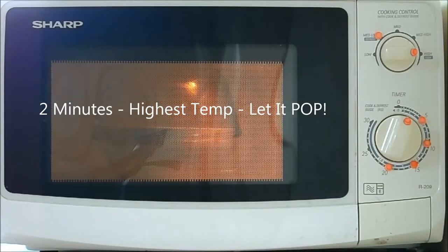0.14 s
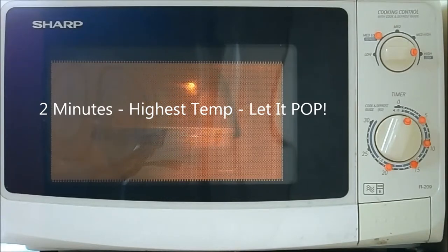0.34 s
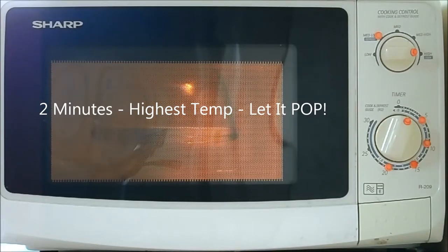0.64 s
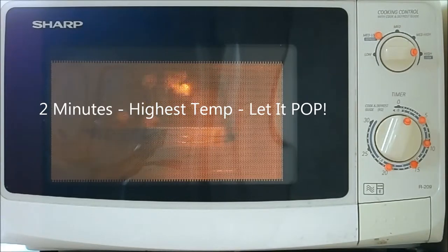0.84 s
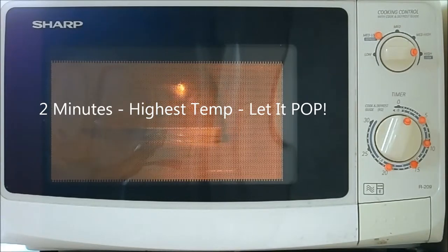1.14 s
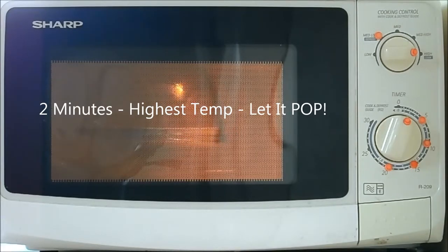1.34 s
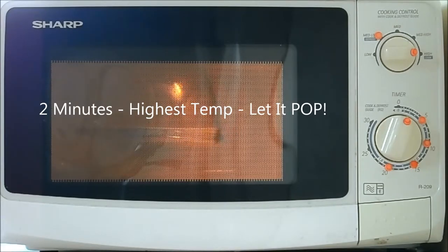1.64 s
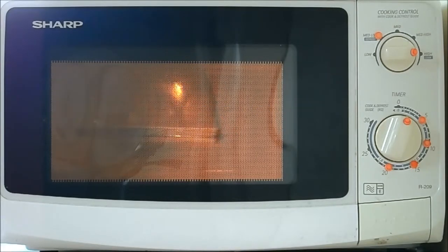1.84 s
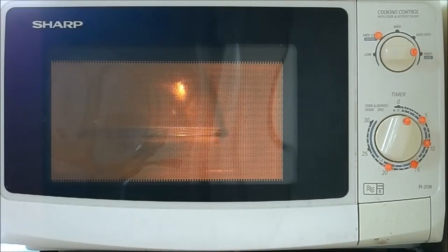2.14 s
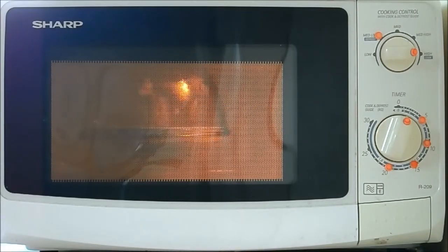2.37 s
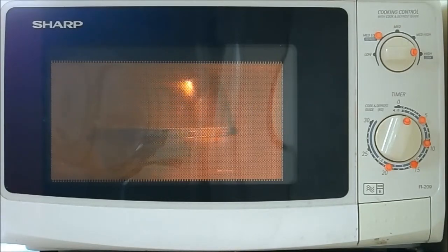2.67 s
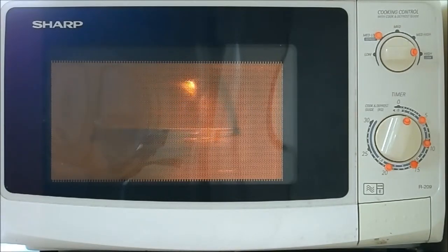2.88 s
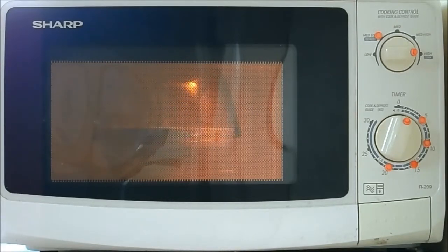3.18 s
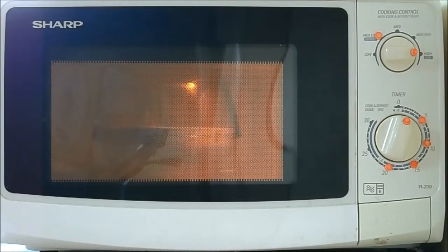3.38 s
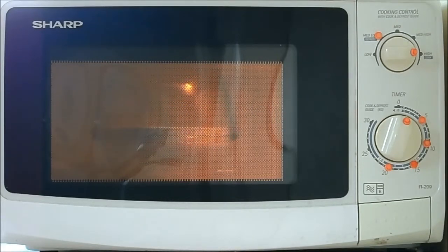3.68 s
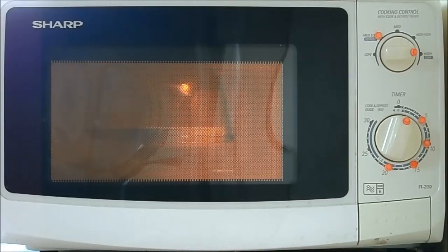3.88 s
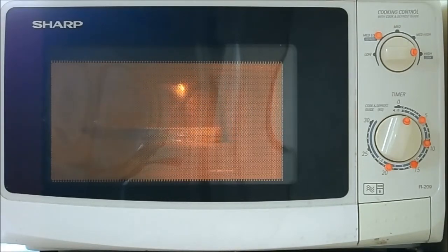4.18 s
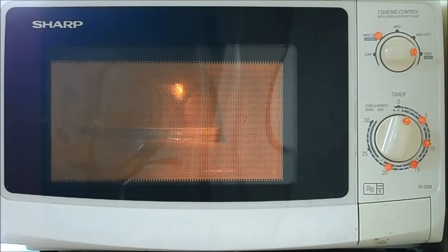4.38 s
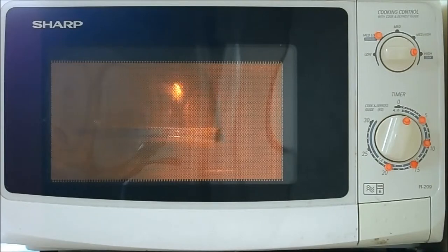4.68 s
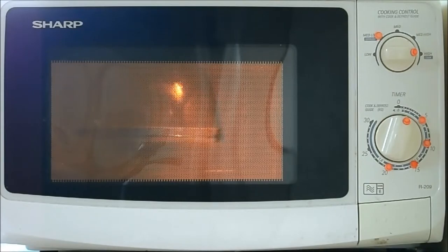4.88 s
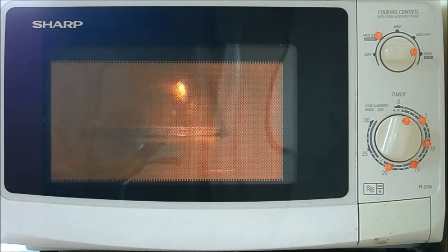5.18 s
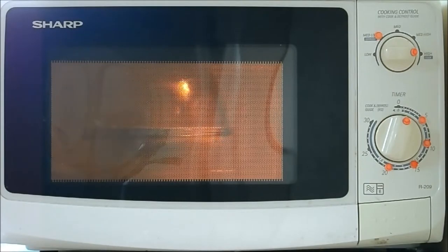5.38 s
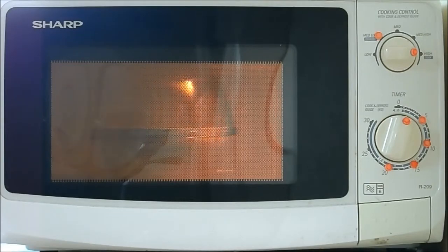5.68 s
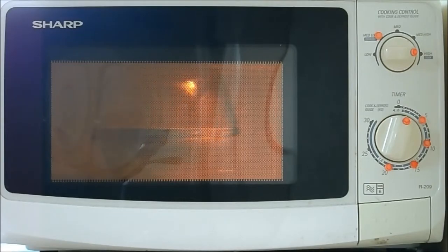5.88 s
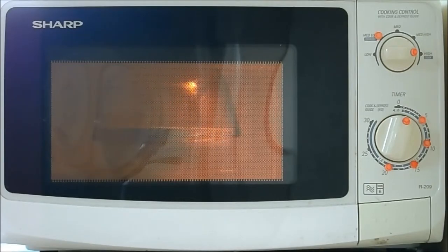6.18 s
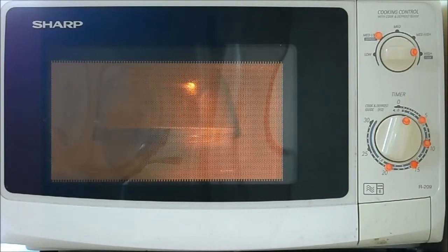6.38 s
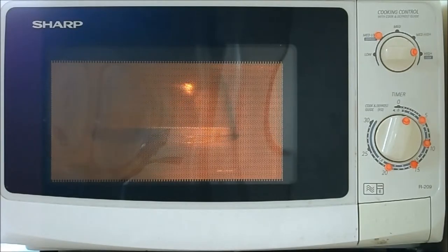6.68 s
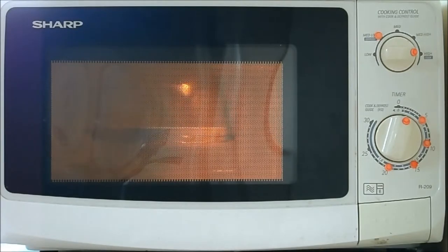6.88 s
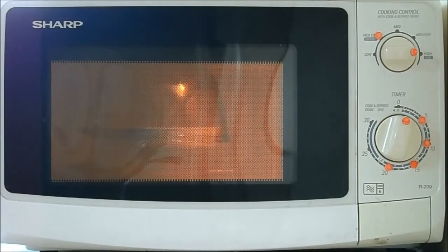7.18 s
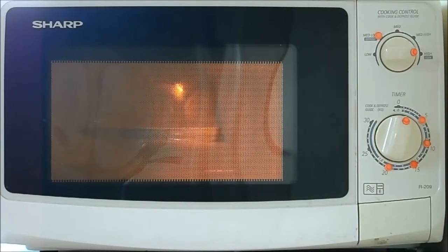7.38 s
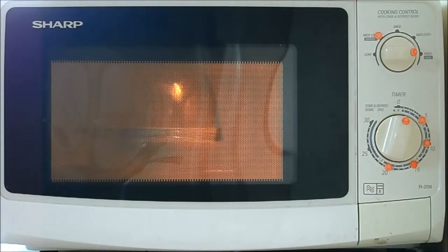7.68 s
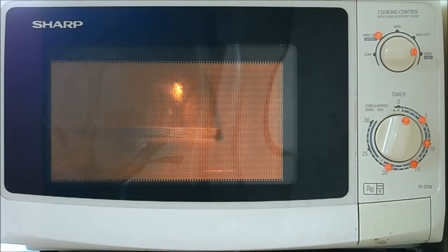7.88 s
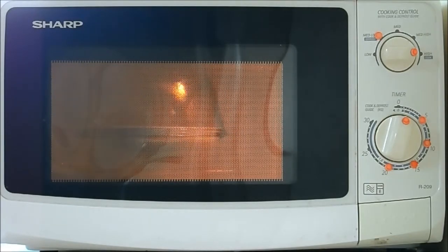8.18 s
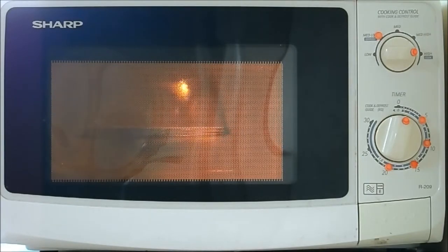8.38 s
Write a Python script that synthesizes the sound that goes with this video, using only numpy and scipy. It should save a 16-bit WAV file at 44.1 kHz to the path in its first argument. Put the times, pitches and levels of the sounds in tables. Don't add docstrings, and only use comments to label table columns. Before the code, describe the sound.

Close, mono pickup of a running microwave oven in a kitchen. A steady fan hum with faint electrical buzz and soft rushing vent air continues throughout. Inside, popcorn bursts singly or in quick pairs at irregular gaps: short, boxy metallic thuds, each with a quick high rattle and brief ring of corn hitting a glass bowl. A few soft low bumps come through the counter near the middle.

```python
import sys
import numpy as np
from scipy import signal
from scipy.fft import rfft, irfft
from scipy.io import wavfile
from scipy.ndimage import uniform_filter1d

SR = 44100
rng = np.random.default_rng(int(sys.argv[2]) if len(sys.argv) > 2 else 0)


def field_ratio(decibels):
    return 10 ** (np.asarray(decibels, dtype=float) / 20)


def put_to_file(sound):
    columns = np.atleast_2d(sound).T
    safe = np.clip(columns, -1, 1)
    whole_steps = np.round(safe * 32767)
    wavfile.write(sys.argv[1], SR, whole_steps.astype(np.int16))


N = 376173

# t/s, peak level/dB, treble level/dB against the usual burst, low bowl ring f/Hz
BURSTS = [(.0063, -32.5, 12, 6320), (.2394, -31, 0, 6390), (.3352, -30.5, -6, 7440),
          (.9035, -32.5, -3, 6630), (1.0628, -30, -4, 7390), (1.1279, -33.5, -2, 6700),
          (1.3128, -31.5, -4, 6420), (1.5332, -32, -3, 6880), (1.5718, -28.5, -8, 6880),
          (1.8315, -27.5, -5, 6630), (1.9204, -30.5, 0, 6510), (2.4484, -38, 0, 6710),
          (2.8359, -33, 4, 6850), (3.2009, -26, -11, 6360), (3.4008, -30.5, 2, 6790),
          (3.8093, -26, 1, 6430), (4.1547, -28, 2, 6670), (4.3586, -35, -2, 6700),
          (4.5175, -32.5, -2, 6570), (4.6794, -29, -2, 6800), (5.3646, -30, 0, 6760),
          (5.8855, -29, -4, 7000), (6.326, -28.5, -4, 7030), (6.5128, -28.5, 7, 7020),
          (6.5543, -24, -1, 6950), (6.6259, -33, -5, 6940), (7.3254, -25.5, -5, 7000),
          (7.3844, -26.5, 2, 6800), (7.5368, -29.5, -3, 7030), (8.3249, -34, -4, 7100)]
# t/s, peak level/dB, treble level/dB, low bowl ring f/Hz
TWINS = [
    (.2537, -32, 6, 7560),
    (1.8379, -39, 0, 6810),
    (3.2134, -24, 4, 6250),
    (4.5247, -30, -5, 6570),
]
# f/Hz, level/dB, t60/s, sign (+1 or -1 as the mode pushes or pulls the door)
CAVITY = [(125, -37, .25, -1), (242, -30, .103, -1), (295, -21, .059, -1), (367, -20, .033, -1),
          (462, -11, .012, 1), (583, -15, .058, -1), (613, -27, .25, 1), (647, -14, .046, 1),
          (738, -16, .049, -1), (858, -9, .054, -1), (874, 0, .017, 1), (931, -6, .026, -1),
          (989, -18, .074, -1), (1036, -17, .056, -1), (1105, -24, .13, 1), (1185, -32, .171, -1),
          (1227, -14, .023, -1), (1325, -32, .082, -1), (1430, -29, .076, -1), (1498, -26, .05, 1),
          (1811, -30, .084, -1), (2080, -27, .12, 1), (2170, -23, .16, -1), (2290, -28, .12, 1),
          (3450, -18, .08, 1)]
# t/s, low ring level/dB,
# middle ring level/dB, high ring level/dB
KNOCKS = [(.0044, -50, -57, -52.5), (.2409, -52, -57, -58), (.2525, -45, -50, -50), (.3371, -50, -55, -51),
          (.911, -47, -50, -59), (1.071, -48, -50, -56), (1.1313, -44, -47.5, -50),
          (1.3164, -50, -45.5, -57), (1.536, -44, -51, -59), (1.575, -49, -51, -60),
          (1.8365, -47, -44.5, -42), (1.922, -53, -48, -37.5), (2.4543, -53, -52, -58),
          (2.837, -46.5, -55, -46), (3.2056, -47, -49, -40), (3.216, -39, -41.5, -44),
          (3.4037, -53, -52, -55), (3.811, -52, -48, -39), (4.1565, -50, -53, -54), (4.524, -49, -47, -54),
          (4.683, -42, -53, -45), (5.3667, -49, -44.5, -45), (5.887, -46, -55, -49), (6.331, -47, -58, -48),
          (6.5153, -54, -55, -59), (6.5574, -39, -54, -48), (7.329, -48, -43, -50),
          (7.3891, -45.5, -51, -62), (7.54, -42, -46, -44), (8.3288, -54, -58, -63),
          (.9552, -54, -59, -58),
    (1.5994, -54, -63, -67),
    (6.3834, -51, -66, -65),
    (6.6268, -60, -63, -56),
]
# f/Hz, level/dB, t60/s
GLASS = [
    [(6250, 0, .07), (6370, 0, .08), (6520, -2, .07), (6750, -3, .06), (6900, 1, .08), (7060, 0, .08),
     (7430, -3, .09)],
    [(10300, -11, .05), (10680, 2, .1), (10850, -4, .07), (11000, -5, .07), (11200, -5, .06),
     (11430, -5, .06), (12100, -14, .04)],
    [(13100, -13, .04), (13700, -3, .07), (13900, 0, .09), (14020, 0, .08), (14200, -2, .07),
     (14400, -5, .06), (14600, -6, .06), (14900, -5, .06), (15300, -10, .05)],
]
# multiple of the shaft speed, rms level/dB
FAN = [(1, -63.5), (4, -44.5), (8, -62), (12, -63), (16, -65), (20, -69.5), (28, -68.5), (34, -75)]
# f/Hz, rms level/dB
BUZZ = [(120, -72), (400, -61.5), (800, -69.5), (1200, -61.5), (1800, -80)]
# f/Hz, level/dB per Hz
AIR = [(25, -20.1), (76, -16.5), (100, -18.5), (200, -10.7), (342, -10.4), (660, 0.0), (860, -8.2),
       (1250, -3.1), (1600, -3.6), (2100, -1.2), (3000, -10.4), (5000, -12.0), (7500, -15.1),
       (10500, -21.9), (15800, -24.4)]
# f/Hz, width/Hz, level/dB (below zero a dip)
VENTS = [(510, 100, -10.0), (770, 20, -10.0), (940, 20, -6.4), (1100, 50, 4.7), (1280, 70, 5.4),
         (1440, 20, 3.6), (1580, 200, -9.9), (1750, 30, -7.5), (1840, 30, -8.1), (1950, 60, -10.0),
         (2070, 40, 2.3), (2430, 160, 5.6), (2500, 40, -10.0), (2620, 60, 3.9), (2950, 40, -4.1),
         (3140, 180, 7.3), (3320, 30, -4.3), (3380, 20, 4.8), (3700, 20, 4.9), (3980, 60, 7.0),
         (4570, 130, 6.3), (4690, 40, -7.1), (5630, 120, 6.6), (5690, 80, -7.1), (6050, 120, 6.3),
         (6260, 620, -6.1), (6650, 200, 5.6), (8410, 190, 6.2), (10000, 60, 3.2), (12270, 170, 3.5)]
# t/s, peak level/dB, f/Hz, t60/s
THUMPS = [
    (4.325, -55, 60.7, 0.16),
    (4.409, -60, 70.0, 0.2),
    (4.459, -66, 88.8, 0.2),
    (4.573, -46, 78.1, 0.1),
    (4.599, -60, 75.4, 0.18),
    (4.585, -58, 280, 0.15),
    (4.618, -48, 84, 0.12),
    (4.719, -58, 94.2, 0.2),
]

BLAST_S = .00057
USUAL_DB, BASS_DB_PER_DB = -29.5, -0.4
REBOUND_S, REBOUND_DB = .012, -13
CONTACT_DB = -9
RING_SHARE, HIGH_PER_LOW = 0.75, 2.12
FAN_HZ, FAN_WOBBLE_HZ = 170.36, 0.235
UNBALANCE_HZ, UNBALANCE = 59.2, 0.086
AIR_DB = -48.5
COUNTER_HZ = 55
FLICKERS, FLICKER_S, FLICKER_DB = 38, .046, -68.5
TOP_HZ = 15730


def walk(rate):
    hold = int(SR / rate)
    steps = np.repeat(rng.standard_normal(N // hold + 1), hold)
    return 1.314 * uniform_filter1d(uniform_filter1d(steps, hold), hold)[:N]


def ring(push, hz, t60):
    pole = np.exp(2j * np.pi * hz / SR - np.log(1000) / (t60 * SR))
    return signal.lfilter([1], [1, -pole], push).imag


def add(out, s, sound):
    i = max(int(s * SR), 0)
    out[i:i + len(sound)] += sound[:N - i]


def rattle(size, count, spread_s, fade_db, first_db):
    push, chance = np.zeros(size), rng.random((count, 3))
    at = (chance[:, 0] * spread_s * SR).astype(int)
    level = field_ratio(-fade_db * (chance[:, 0] + chance[:, 2]))
    push[at] += np.sign(chance[:, 1] - .5) * level
    push[0] = field_ratio(first_db)
    return push


def bursts():
    out = np.zeros(N)
    for s, db, treble_db, _ in BURSTS + TWINS:
        bass_db = BASS_DB_PER_DB * (db - USUAL_DB)
        push = rattle(size=6500, count=7, spread_s=.028, fade_db=7, first_db=12)
        push = np.convolve(push, np.hanning(int(BLAST_S * SR)))[:6500]
        place = rng.standard_normal((len(CAVITY), 2))
        sound = 0
        for (hz, mode_db, t60, way), (shade, detune) in zip(CAVITY, place):
            level_db = mode_db + .7 * shade + bass_db * (hz < 420) + treble_db * (hz > 1700)
            sound = sound + way * field_ratio(level_db) * ring(push, hz * (1 + .002 * detune), t60)
        add(out, s, field_ratio(db) * sound / np.abs(sound).max())
    return signal.sosfilt(signal.butter(2, 170, "high", fs=SR, output="sos"), out)


def glass():
    out = np.zeros(N)
    for s, *family_db in KNOCKS:
        nearest = min(BURSTS + TWINS, key=lambda burst: abs(burst[0] - s))
        low_hz = nearest[3]
        push, back = (rattle(size=3600, count=36, spread_s=.017, fade_db=8, first_db=-8) for _ in range(2))
        add(push, REBOUND_S, field_ratio(REBOUND_DB) * back[:3600 - int(REBOUND_S * SR)])
        for family, level_db in zip(GLASS, family_db):
            hz, mode_db, t60 = np.transpose(family)
            shade, detune = rng.standard_normal((2, len(family)))
            mode_db = mode_db + 2 * shade - np.minimum(abs(hz - low_hz) / 70, 10) * (hz < 8000)
            mode_db -= np.minimum(abs(hz - HIGH_PER_LOW * low_hz) / 120, 7) * (hz > 13000)
            modes = zip(hz * (1 + .003 * detune), mode_db, t60)
            sound = sum(field_ratio(g) * ring(push, f, RING_SHARE * t) for f, g, t in modes)
            door = signal.butter(2, [hz[0] - 150, hz[-1] + 150], "band", fs=SR, output="sos")
            sound = signal.sosfilt(door, sound)
            add(out, s - .002, field_ratio(level_db + 2.5) * sound / np.abs(sound).max())
        contacts = np.diff(push, n=2)
        add(out, s - .002, field_ratio(max(family_db) + CONTACT_DB) * contacts)
    return out


def tone(hz, db, flutter_db):
    level = np.sqrt(2) * field_ratio(db + flutter_db * walk(9.8))
    return level * np.sin(2 * np.pi * (np.cumsum(hz) / SR + rng.random()))


def motor():
    shaft = FAN_HZ + FAN_WOBBLE_HZ * walk(3) / 4
    fan = sum(tone(k * shaft, db, 0.068 + 0.097 * k) for k, db in FAN)
    throb = np.sin(2 * np.pi * UNBALANCE_HZ * np.arange(N) / SR)
    fan = fan * (1 + UNBALANCE * field_ratio(2 * walk(4.4)) * throb)
    buzz = sum(tone(np.full(N, 1. * hz), db, 1.0) for hz, db in BUZZ)
    return fan + buzz


def air():
    hz = np.maximum(np.fft.rfftfreq(N, 1 / SR), 1)
    air_hz, air_db = np.transpose(AIR)
    colour_db = np.interp(np.log(hz), np.log(air_hz), air_db)
    colour_db += sum(db / (1 + (2 * (hz - f) / w) ** 2) for f, w, db in VENTS)
    colour_db += 1.3 * walk(SR / 250)[:len(hz)] * (hz > 6900)
    rush = rfft(rng.standard_normal(N)) * field_ratio(colour_db)
    swell = walk(1.4)
    out = 0
    for octave in range(5, 15):
        share = np.clip(1 - abs(np.log2(hz) - octave), 0, 1)
        out = out + irfft(rush * share, N) * field_ratio(.25 * swell + .6 * walk(12))
    return out * field_ratio(AIR_DB) / np.std(out)


def thumps():
    out = np.zeros(N)
    for s, db, hz, t60 in THUMPS:
        sound = ring(np.r_[np.hanning(400), np.zeros(9000)], hz, t60)
        add(out, s, field_ratio(db) * sound / np.abs(sound).max())
    return signal.sosfilt(signal.butter(2, COUNTER_HZ, "high", fs=SR, output="sos"), out)


def flickers():
    out, size = np.zeros(N), int(FLICKER_S * SR)
    fade = np.sin(np.pi * np.arange(size) / size)
    for when, place in rng.random((FLICKERS, 2)):
        hz = 5000 * 3.0 ** place
        band = signal.butter(6, [hz * .92, hz * 1.08], "band", fs=SR, output="sos")
        hiss = signal.sosfilt(band, rng.standard_normal(2 * size))[size:]
        add(out, when * N / SR, field_ratio(FLICKER_DB - 5 * place) * fade * hiss / hiss.std())
    return out * np.array([[1], [-1]])


def scene():
    return np.tile(bursts() + glass() + motor() + air() + thumps(), (2, 1))


def band_limit(x):
    return signal.sosfilt(signal.butter(12, 16340, fs=SR, output="sos"), x)


def record(dry):
    top_cut = signal.ellip(12, .2, 70, TOP_HZ, fs=SR, output="sos")
    mix = signal.sosfilt(top_cut, dry + flickers())
    return band_limit(mix)


dry = scene()
out = record(dry)
put_to_file(out)
```